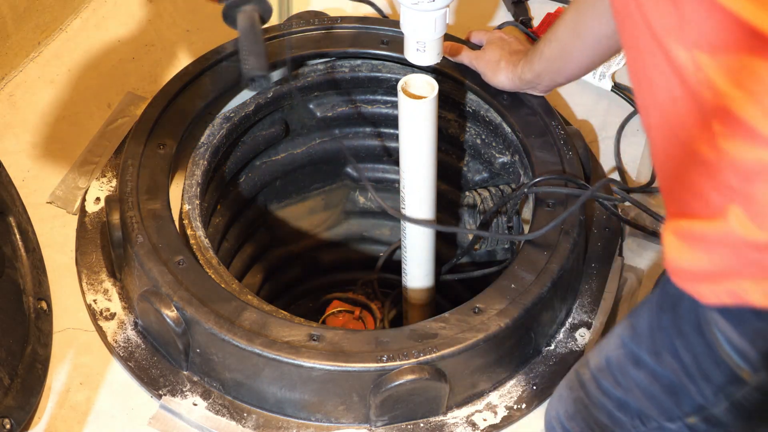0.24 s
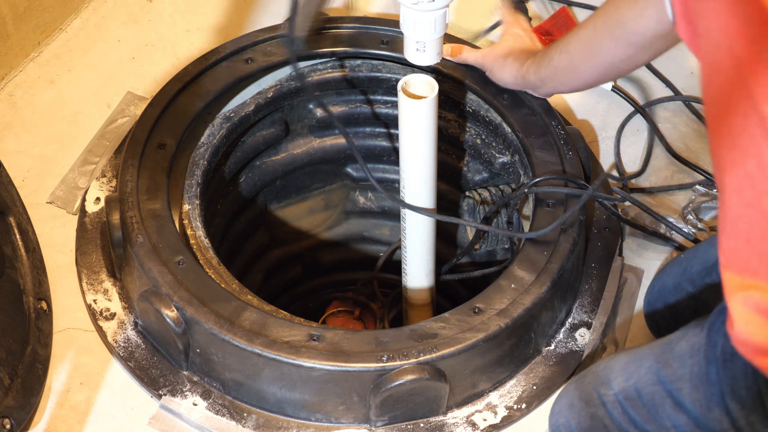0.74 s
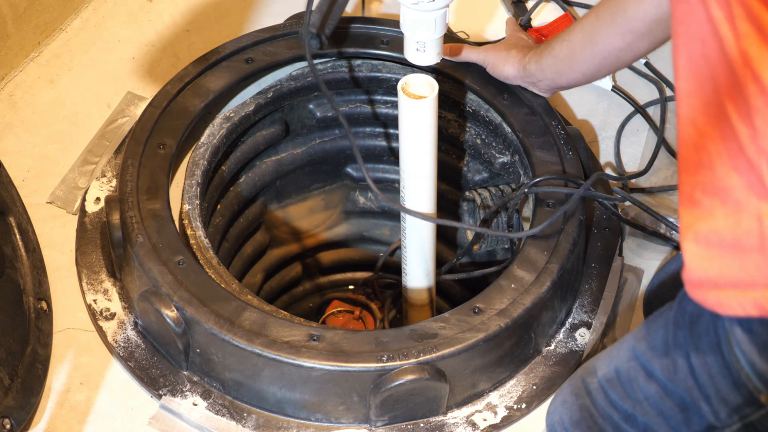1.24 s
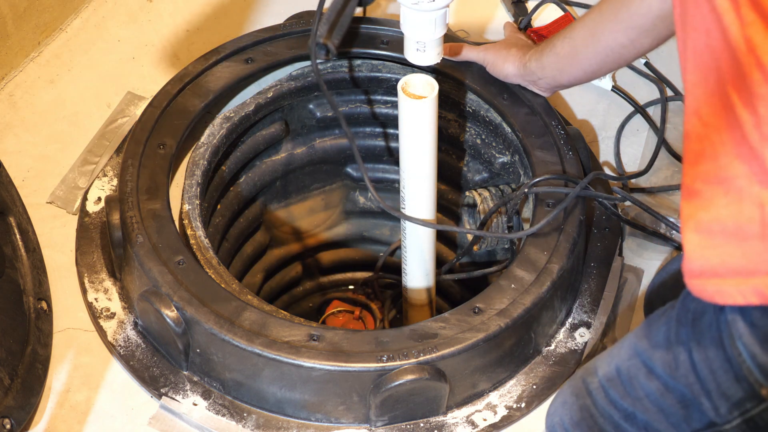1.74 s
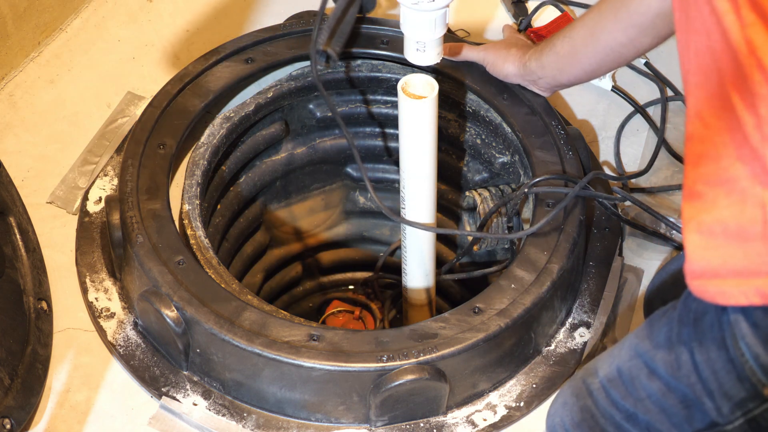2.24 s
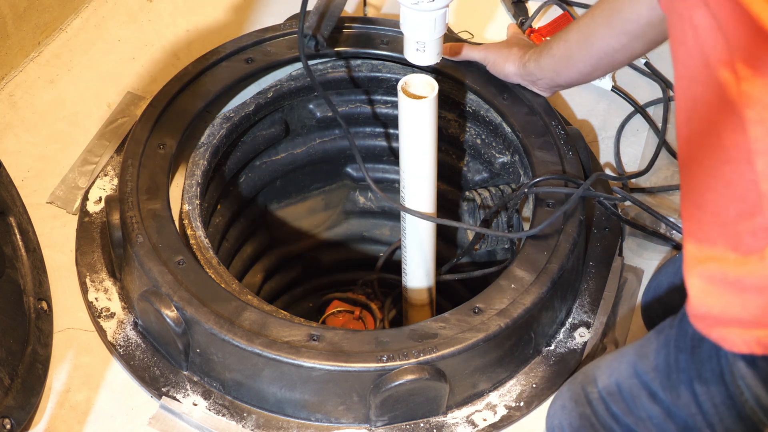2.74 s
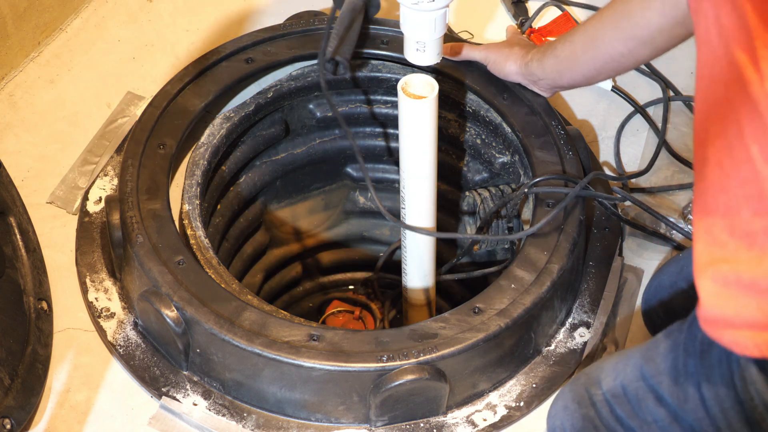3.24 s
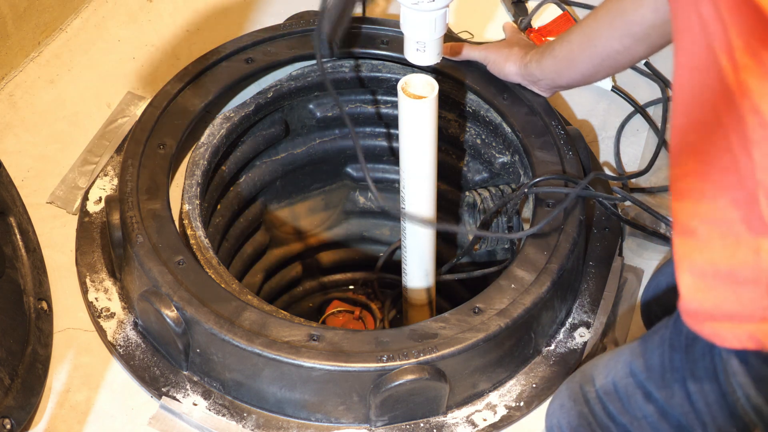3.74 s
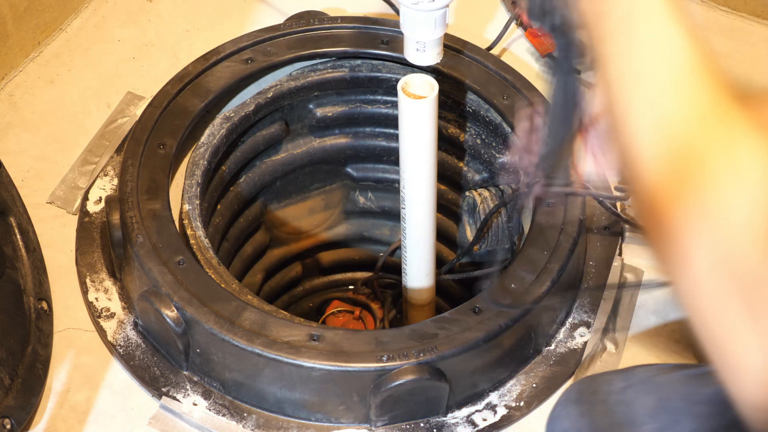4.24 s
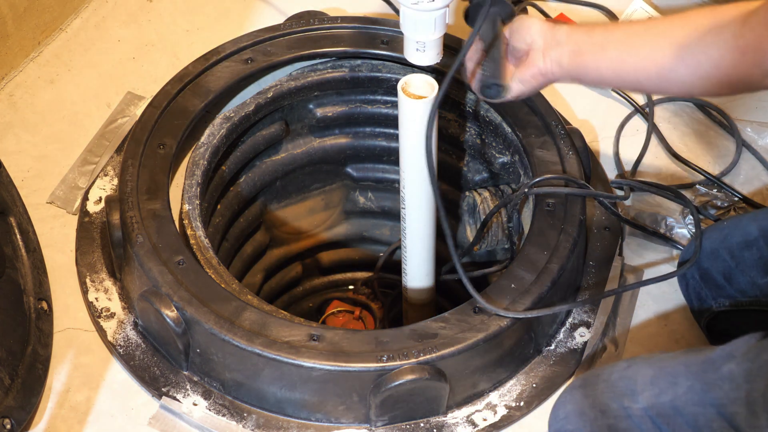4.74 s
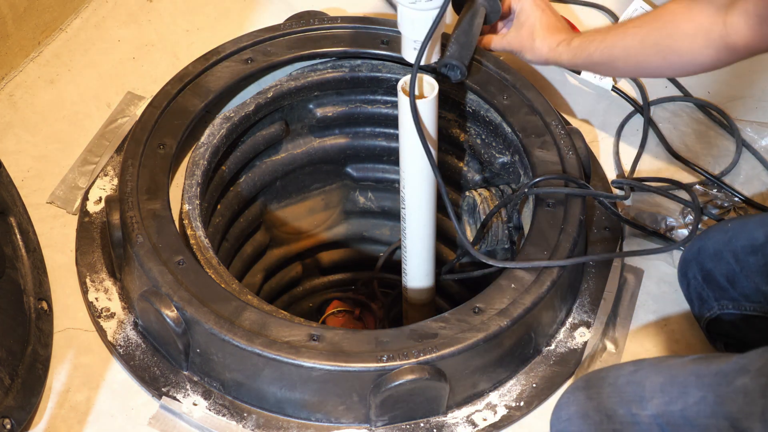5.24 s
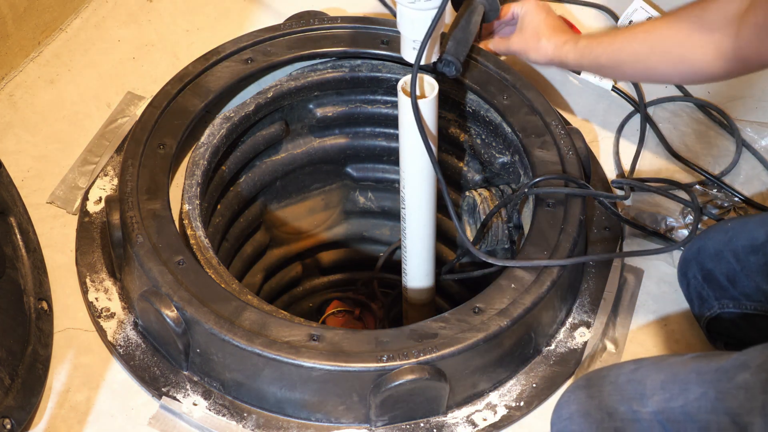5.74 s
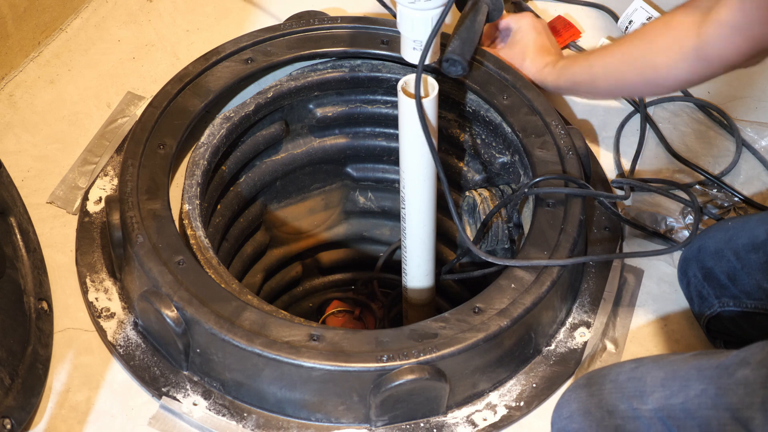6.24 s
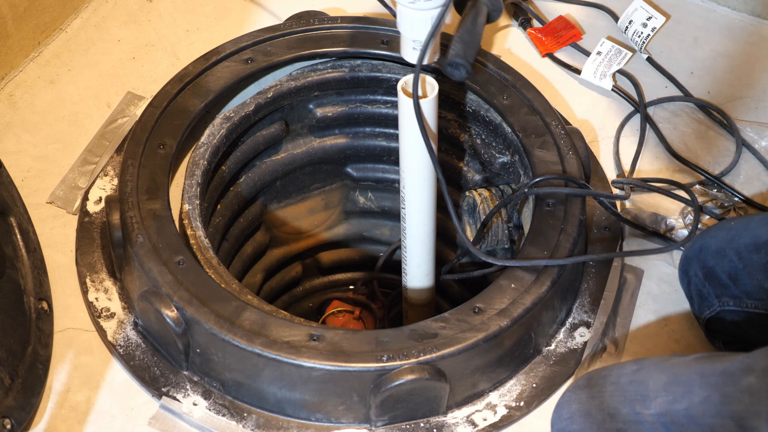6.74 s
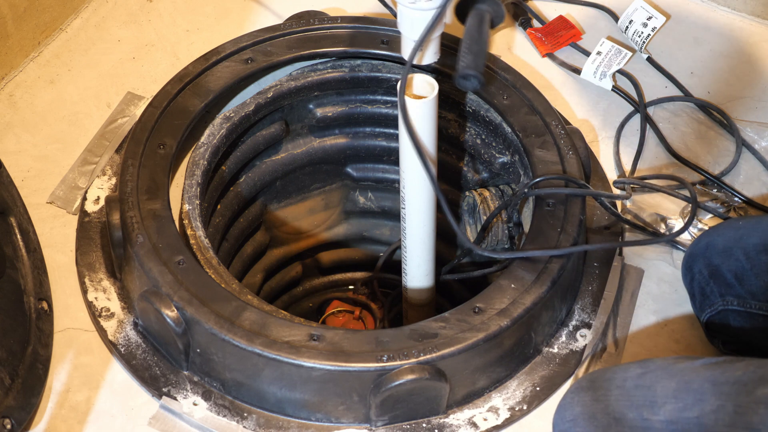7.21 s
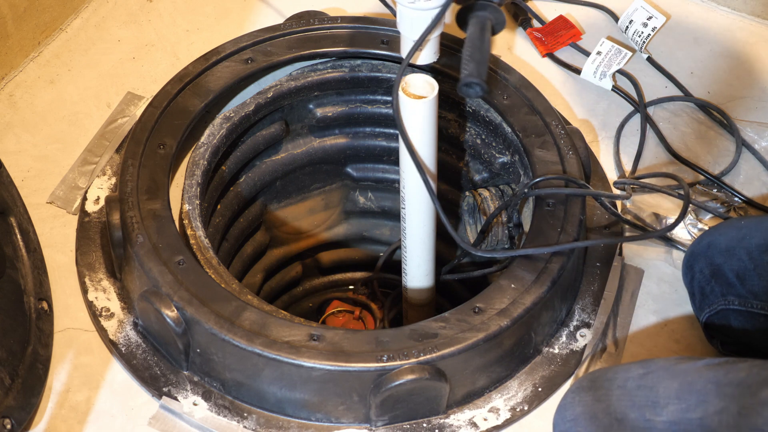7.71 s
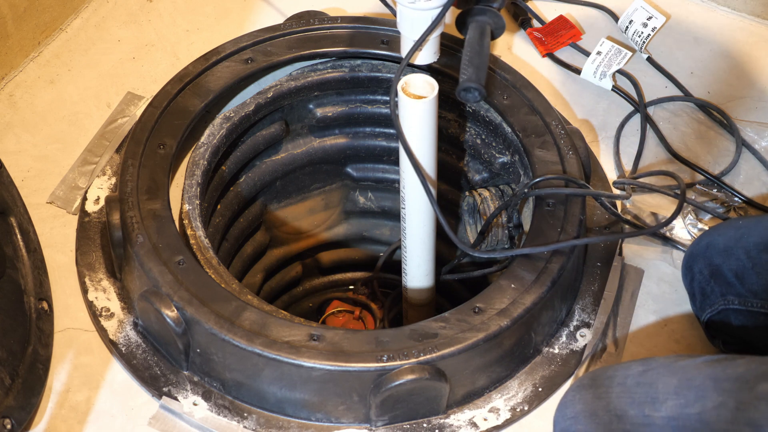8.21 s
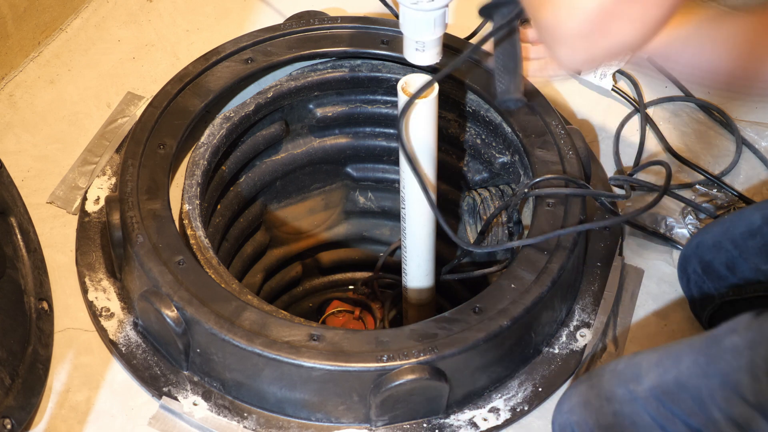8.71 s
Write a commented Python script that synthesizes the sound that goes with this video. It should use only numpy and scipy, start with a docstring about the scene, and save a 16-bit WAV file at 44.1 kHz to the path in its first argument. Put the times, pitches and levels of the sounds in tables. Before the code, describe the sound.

Close, loud bursts of a hammer drill crush concrete in a bare basement, the blows mixed with rattling gears and a high sizzle from the bit. After three short runs, each spinning down, the tool and its cord bump lightly against a plastic basin while a low mains hum swells. The drill then returns for a longer, labouring run with uneven thumps and a few metallic clanks, and coasts to a stop.

```python
"""A corded hammer drill bores into a concrete basement floor in four short runs.
While the bit is pressed down, a piston-driven striker pounds it, shaking the floor and crushing grit.
Lifted, the motor runs free with whining, rattling gears, then coasts to a stop. In the pauses the trigger
clicks and the tool and its cord knock about on a plastic sump basin, over a low mains hum that swells
as the automatic gain control recovers."""
import sys
import numpy as np
from scipy import signal
from scipy.fft import rfft, irfft
from scipy.io import wavfile
from scipy.ndimage import uniform_filter1d

SR = 44100
rng = np.random.default_rng(int(sys.argv[2]) if len(sys.argv) > 2 else 0)


def master(y):
    """Save y as 16-bit WAV."""
    cut = np.clip(np.atleast_2d(y).T, -1, 1)
    pcm = np.round(cut * 32767)  # scale
    wavfile.write(sys.argv[1], SR, pcm.astype(np.int16))


N = 395577
TIME = np.arange(N) / SR
FULL_SPEED = 80   # "speed" always means turns per second of the crank that drives the piston
TREBLE_HZ = (1900, 6000)   # the band in which grit, gears and fan are evened out

# Each pull of the trigger: (pulled [s], released [s], speed with the bit lifted [turns/s],
# motor level [dB], change in motor level after the lift [dB])
RUNS = [(-.1, .53, 81, 3.5, -7), (1.147, 2.545, 77.2, -2.5, -5.5), (3.194, 3.857, 82.7, -1, 2.5),
        (6.821, 8.527, 43.4, -1, -4.5)]
# The bit in the concrete, one list per run, from first bite to lift: (time [s], speed [turns/s],
# push [dB], looseness of the bit [0-1], grit level [dB], floor boom level [dB])
BORING = [
    [(0, 70.22, -6, 0.22, -16, -4), (.13, 70.32, -0.5, 0.1, -23, -5.5), (.17, 70.02, -4.5, 0.22, -14, -2),
     (.22, 69.38, -7, .15, -11, -13.5)],
    [(1.229, 46.1, -2.5, 0.97, -14.5, -12), (1.27, 60.9, 2.5, .5, -17.5, -12),
     (1.335, 72.31, -1.5, .12, -19, -17), (1.45, 71.86, 9.5, .06, -23, -24),
     (1.55, 71.14, 7.5, 0.07, -20.5, -25), (1.63, 70.6, 4, .1, -18.5, -23),
     (1.8, 71.9, 5.5, 0.09, -20, -19.5), (2.06, 70.41, 1, 0.11, -20.5, -17),
     (2.15, 71.07, -2.5, .08, -21, -14.5), (2.408, 69.4, -7.5, .2, -15, -9)],
    [(3.268, 44.97, -2, 0.4, -26.5, -24.5), (3.32, 52.22, 2.1, 0.76, -24, -13),
     (3.36, 51.83, 0, .8, -18, -22), (3.385, 51.65, -2, .8, -19.5, -18.5)],
    [(6.866, 46.48, 12, 0.4, -19, -19), (6.9, 45.82, 11, .9, -16, -9), (6.985, 46.09, 6.5, 0.81, -15, -9),
     (7.11, 48.22, 7, 0.49, -29, -9), (7.185, 49.96, 3.5, 0.67, -25, -7),
     (7.205, 51.01, 9.5, 0.49, -29, -14), (7.27, 52, 6, 0.38, -22, -10.5), (7.44, 54.5, 5, 0.52, -26, -12),
     (7.47, 57.08, 3, 1, -18, -9), (7.51, 59.72, 5.5, .9, -15.5, -2), (7.56, 59.25, 0.5, 1, -15.5, -9),
     (7.635, 62.95, 3.5, .9, -18.5, -8), (7.68, 59.14, 1, 0.78, -14, -0.5),
     (7.74, 52.3, 0.5, 0.56, -15.5, -13), (7.8, 49.06, 3, 0.67, -22, -10),
     (7.88, 49.18, 1.5, 0.56, -26, -11), (7.94, 45.88, 1.5, .4, -33, -12.5),
     (8.03, 44.34, 0, 0.22, -34.5, -14), (8.15, 43.96, -0.5, 0.061, -32, -9),
     (8.29, 44.52, -2.5, 0.14, -39, -11), (8.41, 45.46, -4.5, .7, -19, -17),
     (8.458, 46.22, -8, .8, -12, -11)],
]


def hammer(turns, speed, heavy_below_speed=68, body_db=-2, grit_db=9):
    """The blows shake tool and floor, crush grit and make the bit ring."""
    # Tone of crumbling concrete: (frequency [Hz], level [dB])
    grit_colour = [(60, -15.5), (250, -10), (450, -14), (800, 10), (1400, 8.5), (2000, 5.5), (4000, 1),
                   (7000, -7.5), (10200, -12), (15500, -22.5)]
    looseness = np.clip(boring(axis=3), 0, 1)
    pace = speed / heavy_below_speed
    heavy = np.sqrt(np.clip(2 * (1 - pace), 0, 1))   # a struggling motor strikes with a deeper thump
    blows = striker(turns, looseness, heavy)
    body = tool_and_floor(blows, turns, pace, looseness, heavy)
    crushing = crush(blows, looseness)
    grit = levelled(coloured(crushing, grit_colour), TREBLE_HZ)
    blow_gain, grit_gain = blow_levels(speed)
    return blow_gain * (from_db(body_db) * body + bit_song(crushing)) + from_db(grit_db) * grit_gain * grit


def striker(turns, looseness, heavy, jitter_s=.0007, spread_db=2, bounce_share=.34, return_share=.5):
    """One blow per crank turn, then two bounces of the bit; a loose bit makes them uneven."""
    turn = np.arange(int(turns[-1]))
    chance = rng.standard_normal((len(turn), 7))
    loose, strain = np.interp(turn, turns, looseness), np.interp(turn, turns, heavy)
    when = np.interp(turn, turns, TIME) + jitter_s * loose * chance[:, 0]
    blows = clicks(when, from_db(spread_db * loose * chance[:, 1]))
    stray_turns = .061 * (.03 + loose)
    for k in (1, 2):
        when = np.interp(turn + k / 3 + stray_turns * chance[:, 1 + k], turns, TIME)
        blows += clicks(when, bounce_share * (1 - strain / 2) * from_db(spread_db * loose * chance[:, 4]))
    # a struggling piston knocks again on its way back
    when = np.interp(turn + .45 + stray_turns * chance[:, 5], turns, TIME)
    return blows - clicks(when, return_share * strain * from_db(spread_db * loose * chance[:, 6]))


def tool_and_floor(blows, turns, pace, looseness, heavy, thump_db=-3, rumble_db=-29):
    """Tool and floor ring at each blow; fast blows shake the floor and uneven ones make it rumble."""
    # Ringing of tool and floor under any blow: (frequency [Hz], width [Hz], level [dB])
    blow_modes = [(204.2, 86, -21), (323, 57, -18.5), (470, 49, -7.5), (512.2, 16, 2.5), (567, 45, 0),
                  (642.8, 32, 4.5), (735, 147, 3.5), (776.7, 15, 5), (855.4, 13.7, 0), (928, 43, 4),
                  (965, 31, 0), (1090, 52, -0.5), (1151, 7.6, 3), (1293, 49, -3), (1353, 46, 1),
                  (1687, 92, -14), (1960, 120, -18.5), (2070, 170, -13.5), (2900, 220, -25.5)]
    # Extra ringing under slow, heavy blows: (frequency [Hz], width [Hz], level [dB])
    thump_modes = [(331, 500, -10.5), (412.7, 99, 5), (512, 190, 0.5), (670, 100, 4), (892, 95, -0.5),
                   (1341, 23, 9.5), (1519, 28, 8)]
    # Boom of the floor: (frequency [Hz], width [Hz], level [dB])
    floor_modes = [(313, 84, -6.5), (347, 42, 6), (404, 56, 0)]
    # Low tones of the shaking floor: (multiple of the crank speed, level [dB])
    shake_tones = [(1, -31), (2, -21.5), (3, -28.5)]
    spread_db = 3 * looseness
    ring = struck(blows, blow_modes, spread_db)
    thump = from_db(thump_db) * heavy * struck(blows, thump_modes, spread_db)
    boom = from_db(boring(axis=5)) * resonate(blows, floor_modes)
    shake = sum(from_db(db) * np.sin(2 * np.pi * multiple * turns) for multiple, db in shake_tones)
    body = levelled(ring + thump + boom, band_hz=(330, 1150))
    return body + pace ** 2 * shake + from_db(rumble_db) * looseness ** 2 * rumble()


def crush(blows, looseness, crush_s=.0067, crack_share=.68, grind_share=.83):
    """A firm bit cracks the concrete the same way at every blow, a loose one differently each time."""
    age = TIME[:SR // 20]
    crack = signal.oaconvolve(blows, rng.standard_normal(len(age)) * np.exp(-age / crush_s))[:N]
    bursts = np.sqrt(looseness) * dying(np.abs(blows), crush_s)
    return crack_share * np.sqrt(1 - looseness) * crack + (bursts + grind_share) * rng.standard_normal(N)


def bit_song(crushing, flicker_db=2, band_hz=(11000, 15500)):
    """The steel bit sizzles very high up and rings, unsteadily, along its length."""
    # Brightest soon after the bite, duller as dust packs round the bit:
    # (time [s], sizzle level [dB], ring compared with sizzle [dB])
    brightness = [(0, -19, -2), (.08, -24, -4), (1.24, -15, -6), (1.45, -21.5, -2.5), (1.85, -23, -2),
                  (2.15, -22, -9.5), (2.4, -17, -15), (3.35, -22, -14), (6.87, -18, -7), (6.96, -15, 0),
                  (7.1, -25, -7), (7.43, -27, -9), (7.52, -18, -7), (7.8, -22, -6), (8.4, -26, -2)]
    # Tone of the sizzle: (frequency [Hz], level [dB])
    sizzle_colour = [(2000, -41), (9000, -17.5), (10500, -9.5), (12000, 0), (14700, 0.5), (15700, -2.5)]
    # Ringing along the bit: (frequency [Hz], width [Hz], level [dB])
    bit_modes = [(13230, 130, 0), (13350, 130, -1)]
    sizzle = levelled(coloured(crushing, sizzle_colour), band_hz)
    ring = levelled(resonate(crushing, bit_modes), band_hz)
    ring_db = curve(brightness, axis=2) + flicker_db * drift(seconds=.012)
    return from_db(curve(brightness)) * (sizzle + from_db(ring_db) * ring)


def blow_levels(speed, base_db=-6, db_per_doubling=15.5, graze_share=.29):
    """Gains of blows and grit follow speed and push; the lifted bit grazes the hole for a moment."""
    force_db = base_db + db_per_doubling * np.log2(speed / FULL_SPEED) + boring(axis=2)
    lifts = [rows[-1][0] for rows in BORING]
    grazing = graze_share * sum((TIME > lift) * swell(lift, half_s=.03) for lift in lifts)
    blow_gain = from_db(force_db) * np.maximum(pressed(fade_s=.0057), grazing)
    grit_gain = from_db(force_db + boring(axis=4)) * pressed(fade_s=.017)
    return blow_gain, grit_gain


def snags(clank_s=.011):
    """The bit catches and the tool kicks: a short clatter rings its steel."""
    # Each kick: (time [s], level [dB])
    kicks = [(.157, -25), (.192, -26.5), (1.227, -24.5), (1.589, -12), (6.866, -6), (6.92, -27),
             (7.466, -12), (7.64, -25)]
    # Ringing of the steel: (frequency [Hz], width [Hz], level [dB])
    clank_modes = [(720, 280, -2), (1580, 60, 4.5), (2000, 400, -4.5), (2880, 99, 7), (3900, 1500, -13)]
    when, db = np.transpose(kicks)
    clatter = rng.standard_normal(N)
    bursts = dying(clicks(when, from_db(db)), clank_s) * clatter
    return resonate(bursts, clank_modes) / resonate(clatter, clank_modes).std()


def crank_speed(creep_speed=13.3, start_steepness=5, run_free_s=.107, coast_s=.195):
    """The motor creeps, speeds up until the bit bites, labours, runs free when lifted, then coasts."""
    speed = np.ones(N)
    for (pulled, released, free_speed, *_), rows in zip(RUNS, BORING):
        bite, lift = rows[0][0], rows[-1][0]
        start = np.clip((TIME - pulled) / (bite - pulled), 0, 1) ** start_steepness
        driven = creep_speed * (curve(rows) / creep_speed) ** start
        driven += (free_speed - driven) * (1 - np.exp(-(np.maximum(TIME - lift, 0) / run_free_s) ** 2))
        coast = np.exp(-np.maximum(TIME - released, 0) / coast_s)
        speed = np.maximum(speed, driven * coast * (TIME >= pulled))
    return speed


def motor_level(speed, base_db=-13, db_per_doubling=12, rattle_db=-60, stall_speed=13.26):
    """The motor grows louder with speed and load, and falls silent as friction stops it."""
    speed_db = base_db + db_per_doubling * np.log2(speed / FULL_SPEED)
    load_db = per_run(axis=3) + boring(axis=2) * pressed(fade_s=.018)
    # the gears go slack as soon as the bit is lifted, and slowly recover
    since_lift = [np.maximum(TIME - rows[-1][0], 0) for rows in BORING]
    slack = sum((1 - np.exp(-age / .0092)) * np.exp(-age / .93) for age in since_lift)
    running = from_db(speed_db + load_db + per_run(axis=4) * slack)
    turning = 1 / (1 + (stall_speed / speed) ** 20)
    return turning * (running + from_db(rattle_db))   # the gears rattle at any speed


def gears_and_fan(turns, speed, level, tooth_count=44, jitter_s=.0001, fan_db=-3, housing_db=2, gain_db=-3):
    """Gear teeth clatter in a pattern that repeats each turn, along with the rush of the cooling fan."""
    # Tone of gears and fan: (frequency [Hz], level [dB])
    motor_colour = [(60, -34), (250, -32), (400, -18), (560, -5), (900, -2), (1500, 1.5), (1800, -2),
                    (2900, -2), (4000, -3), (4900, -11.5), (6000, -11), (7500, -16.5), (10200, -19.5),
                    (12000, -22.5), (15500, -27.5)]
    # Ringing of the gear housing: (frequency [Hz], width [Hz], level [dB])
    housing_modes = [(570, 35, -14.5), (737, 45, 4.5), (1050, 48, -12.5), (1336, 66, -10.5),
                     (1492, 52, -2.5), (1653, 80, -8), (2880, 400, -11.5)]
    place = rng.random(tooth_count)
    wear = from_db(-1.5 * rng.standard_normal(tooth_count))
    contacts = np.arange(int(turns[-1]))[:, None] + place
    when = np.interp(contacts, turns, TIME) + jitter_s * rng.standard_normal(contacts.shape)
    sizes = wear * rng.choice([-1, 1], tooth_count) * from_db(3 * rng.standard_normal(contacts.shape))
    teeth = levelled(clicks(when.ravel(), sizes.ravel()), TREBLE_HZ)
    fan = levelled(rng.standard_normal(N), TREBLE_HZ)
    drive = coloured(teeth * np.sqrt(speed / speed.max()) + from_db(fan_db) * fan, motor_colour)
    housing = from_db(housing_db) * resonate(drive, housing_modes)
    return from_db(gain_db) * level * levelled(drive + housing, TREBLE_HZ)


def whine(turns, speed, level, waver_s=.0042, throb=.48, shake_db=-47.5, swing_turns=.0005):
    """Tones follow the crank and swell where the housing carries them; the piston shakes the tool."""
    # Tones of the crank and of the motor, which spins 9.4 times as fast:
    # (multiple of the crank speed, level [dB], loudest at [turns/s], spread [octaves], roughness [0-1])
    tones = [(7, -21, 83, .06, .2), (8, -20, 79, .04, .2), (9, -15, 83, .04, .25),
             (9.4, -7.5, 83, .035, .2), (13, -18, 83, .05, .2), (15, -12.5, 81, .12, .2),
             (16, -13, 83, .06, .25), (18, -7.5, 83, .06, .25), (19, -5, 79.8, .025, .25),
             (20, -12, 83, .05, .25), (30, -16, 83, .12, .4), (34.4, -7, 44, .05, .8),
             (65.8, -6.5, 45, .13, .85), (65.8, -6.5, 30, .25, .85), (84.6, -12, 32, .25, .9),
             (112.8, -13, 28, .25, .9), (47, -12, 32, .25, .9), (94, -17, 80, .1, .6),
             (103.4, -23, 83, .04, .6), (112.8, -24, 83, .04, .6)]
    stroke = np.sin(2 * np.pi * turns)
    out = from_db(shake_db) * stroke * np.clip(speed / 20 - 2, 0, 2)
    swing = swing_turns * (FULL_SPEED / speed) ** 2 * stroke   # the piston makes a slow crank run unevenly
    for multiple, db, best_speed, spread, rough in tones:
        angle = 2 * np.pi * (multiple * (turns + swing) % 1)
        gain = from_db(db) * np.exp(-.5 * np.minimum((np.log2(speed / best_speed) / spread) ** 2, 50))
        tone = (1 + rough * drift(waver_s)) * np.sin(angle) + rough * drift(waver_s) * np.cos(angle)
        out += gain * (1 + throb * rough * stroke) * tone
    # during a hard start no tone has time to build
    acceleration = uniform_filter1d(np.maximum(np.gradient(speed) * SR, 0), size=1500)
    return level * out / (1 + (acceleration / 170) ** 2)


def brushes(turns, speed, level, pulses_per_turn=14, pulse_depth=.55, gain_db=-12):
    """The carbon brushes that feed the motor its current spark, ever more as it races."""
    # Rasp of the brushes: (frequency [Hz], width [Hz], level [dB])
    brush_modes = [(5540, 1100, -2), (7600, 700, -4), (9500, 900, -13.5)]
    sparks = rng.standard_normal(N) * (1 + pulse_depth * np.sin(2 * np.pi * pulses_per_turn * turns))
    return from_db(gain_db) * level * (speed / speed.max()) ** 3 * rms_one(resonate(sparks, brush_modes))


def knocks_and_clicks(thud_db=3, scuff_db=2, slide_db=-2, grain_db=3.5, spread_db=3, loss_db_per_octave=5):
    """Each knock or click is a brief scrape that rings like hollow plastic, with a bright scuff on top."""
    # Knocks on the basin, plus trigger clicks and the gears' last knock as the drill stops:
    # (time [s], thud level [dB], scuff level [dB], length [s], strongest at [Hz])
    knocks = [(0.964, -56, -89, 0.041, 706), (1.019, -58, -81, 0.0097, 700), (1.074, -54, -81, 0.0051, 700),
              (1.128, -45.5, -58, 0.0043, 910), (1.147, -52, -41, 0.014, 2007),
              (2.916, -63, -52, 0.015, 2000), (3.076, -64, -77, 0.014, 1200),
              (3.154, -59, -60, 0.027, 1200), (3.189, -45.5, -51, 0.0062, 1400),
              (4.21, -52, -41, 0.03, 2000), (4.289, -48.5, -53.5, 0.029, 1300),
              (4.342, -45, -59, 0.019, 795), (4.509, -70, -69, 0.035, 1500),
              (4.679, -45.5, -74, 0.025, 620), (4.735, -55.5, -79, 0.016, 1200),
              (4.782, -57.5, -84, 0.021, 800), (4.829, -82, -72, 0.025, 2400),
              (4.873, -53, -54, 0.017, 1100), (4.921, -53.5, -55.5, 0.016, 900),
              (5.147, -55.5, -80, 0.021, 1200), (5.17, -66, -84, 0.026, 260),
              (5.24, -75, -69.5, 0.017, 1190), (5.358, -89, -72, 0.03, 1200), (5.76, -56, -69, 0.02, 1080),
              (5.903, -66.5, -84, .012, 500), (6.345, -73, -73.5, 0.018, 1200),
              (6.609, -82, -73, 0.025, 1200), (6.74, -82, -65, 0.068, 1200), (8.765, -68, -45, .022, 1970)]
    # Cord and sleeve sliding: (middle [s], half length [s], level [dB])
    slides = [(1.11, 0.079, -80), (3.127, 0.12, -79.5), (4.765, 0.45, -76.5), (5.095, 0.087, -68.5),
              (6.69, 0.05, -78.5), (8.924, 0.08, -74.5)]
    # Ringing of the basin, used for all knocks and clicks: (frequency [Hz], width [Hz], level [dB])
    basin_modes = [(260.6, 170, -8), (520, 84, 0), (693, 59, -4.5), (931, 110, -6), (1310, 290, -10.5),
                   (2070, 220, -13), (2384, 200, -16), (3010, 150, -21), (3380, 270, -16.5)]
    # Tone of the scuffing: (frequency [Hz], level [dB])
    scuff_colour = [(530, -16), (900, 0.5), (1130, -8.5), (1330, 1), (1700, -5), (3610, -7.5), (4790, -14),
                    (7580, -19), (15000, -32)]
    push, scuff = np.zeros((len(basin_modes), N)), np.zeros(N)
    shares = from_db(spread_db * rng.standard_normal((len(knocks), len(basin_modes))))
    mode_hz = np.array(basin_modes)[:, 0]
    for (when, low_db, high_db, length, hz), share in zip(knocks, shares):
        share = share * from_db(-loss_db_per_octave * np.abs(np.log2(mode_hz / hz)))
        start = int(when * SR)
        age = TIME[:min(N - start, SR // 4)]
        shape = (1 - np.exp(-age / (.55 * length))) * np.exp(-(age / length) ** 2)
        push[:, start:start + len(age)] += from_db(low_db + thud_db) * rms_one(share)[:, None] * shape
        scuff[start:start + len(age)] += from_db(high_db + scuff_db) * shape
    scuff += sum(from_db(slide_db + db) * swell(middle, half) for middle, half, db in slides)
    soft_contact = signal.butter(2, 3200, fs=SR, output="sos")
    friction = signal.sosfilt(soft_contact, rng.standard_normal(N))
    friction /= resonate(friction, basin_modes).std()
    thuds = sum((-1) ** k * resonate(push[k] * friction, [mode]) for k, mode in enumerate(basin_modes))
    hiss = rng.standard_normal(N)
    grains = from_db(grain_db * rms_one(dying(rng.standard_normal(N), seconds=.003)))
    return thuds + coloured(scuff * rms_one(hiss * grains), scuff_colour)


def basement(x, echo_db=-9.5, first_echo_s=.003, fade_s=.13):
    """Bare walls and floor add a short, dense, bright echo that makes gliding tones flutter."""
    # Tone of the echo: (frequency [Hz], level [dB])
    echo_colour = [(900, -4), (2200, 0)]
    age = TIME[:SR // 2]
    tail = rng.standard_normal(len(age)) * from_db(-60 * age / fade_s) * (age > first_echo_s)
    echo = signal.oaconvolve(x, tail / np.linalg.norm(tail))[:N]
    return x + from_db(echo_db) * coloured(echo, echo_colour)


def background(hum_db=-58, air_db=-76, rumble_db=-76.5):
    """Mains hum, the still air of the basement and the far rumble of the house."""
    # Tones of the mains hum: (frequency [Hz], level [dB])
    hum_tones = [(120, -5), (240, -38.5), (360, -21), (600, -38.5)]
    # Tone of the air: (frequency [Hz], level [dB])
    air_colour = [(20, 6), (100, -0.5), (200, -2), (400, -3.5), (800, -13.5), (1600, -18), (4000, -26),
                  (8000, -28), (12500, -30.5), (15500, -44.5)]
    hum = sum(from_db(db) * np.sin(2 * np.pi * (hz * TIME + rng.random())) for hz, db in hum_tones)
    air = coloured(rng.standard_normal(N), air_colour)
    return from_db(hum_db) * np.sqrt(2) * hum + from_db(air_db) * air + from_db(rumble_db) * rumble()


def rumble(lump_db=3):
    """Low noise that swells and sinks at random."""
    # Tone of the rumble: (frequency [Hz], level [dB])
    rumble_colour = [(10, -10), (28, -2), (52, 0), (80, -10.5), (150, -13), (300, -33.5), (1500, -69.5)]
    lumps = from_db(lump_db * rms_one(dying(dying(rng.standard_normal(N), .02), .02)))
    return rms_one(lumps * coloured(rng.standard_normal(N), rumble_colour))


def gain_control(x, threshold_db=-41, share=.78, attack_s=.004, release_db_per_s=26):
    """Loud sound quickly turns the volume down; it creeps back, so the hum swells in the pauses."""
    level_db = 10 * np.log10(np.abs(uniform_filter1d(x[0] ** 2, size=882)) + 1e-14)
    recovery = release_db_per_s * TIME
    cut_db = np.maximum.accumulate(share * np.maximum(level_db - threshold_db, 0) + recovery) - recovery
    r = np.exp(-1 / (attack_s * SR))
    return x * from_db(-signal.lfilter([1 - r], [1, -r], cut_db, zi=[r * cut_db[0]])[0])


def boring(axis):
    """One column of BORING over the whole scene."""
    return curve([row for rows in BORING for row in rows], axis=axis)


def per_run(axis):
    """One column of RUNS, held from each pull of the trigger to the next."""
    runs = np.array(RUNS)
    return runs[np.searchsorted(runs[1:, 0], TIME), axis]


def pressed(fade_s):
    """1 while the bit is on the concrete, fading on either side."""
    return sum(swell(np.clip(TIME, rows[0][0], rows[-1][0]), fade_s) for rows in BORING)


def curve(rows, axis=1):
    """One column of a table, joined by straight lines in time."""
    rows = np.array(rows)
    return np.interp(TIME, rows[:, 0], rows[:, axis])


def swell(middle_s, half_s):
    """A bell-shaped rise and fall of height 1."""
    return np.exp(-np.minimum(((TIME - middle_s) / half_s) ** 2, 100))


def drift(seconds, step=32):
    """A smooth random wobble that changes over about the given time."""
    r = np.exp(-step / (seconds * SR))
    slow = signal.lfilter([1], [1, -2 * r, r * r], rng.standard_normal(N // step + 2))
    return np.interp(np.arange(N) / step, np.arange(len(slow)), rms_one(slow))


def clicks(times, sizes):
    """One-sample clicks at the given times."""
    at = np.round(times * SR).astype(int)
    inside = (at >= 0) & (at < N)
    return np.bincount(at[inside], sizes[inside], N)


def dying(x, seconds):
    """Give each click a fading tail."""
    return signal.lfilter([1], [1, -np.exp(-1 / (seconds * SR))], x + 1e-18)


def resonate(x, modes):
    """Ring an object's modes (its natural tones) and add them with alternating signs."""
    out = np.zeros(N)
    for k, (hz, width, db) in enumerate(modes):
        r = np.exp(-np.pi * width / SR)
        ring = signal.lfilter([1, 0, -1], [1, -2 * r * np.cos(2 * np.pi * hz / SR), r * r], x + 1e-18)
        out += (-1) ** k * from_db(db) * (1 - r * r) / 2 * ring
    return out


def struck(blows, modes, spread_db):
    """Every blow rings each mode with a random strength of its own."""
    at = np.flatnonzero(blows)
    sizes = blows[at, None] * from_db(spread_db[at, None] * rng.standard_normal((len(at), len(modes))))
    return sum((-1) ** k * resonate(clicks(TIME[at], sizes[:, k]), [mode]) for k, mode in enumerate(modes))


def coloured(x, spectrum, size=4096):
    """Shape the tone with a filter that never rings ahead of the sound (minimum phase)."""
    hz, db = np.transpose(spectrum)
    grid = np.maximum(np.fft.rfftfreq(size, 1 / SR), 1)
    cepstrum = irfft(np.log(from_db(np.interp(np.log(grid), np.log(hz), db))))
    cepstrum[1:size // 2] *= 2
    cepstrum[size // 2 + 1:] = 0
    response = irfft(np.exp(rfft(cepstrum)))
    return signal.oaconvolve(x, response / np.linalg.norm(response))[:N]


def levelled(x, band_hz):
    """Even out a sound so that its level within one band stays near 1."""
    part = signal.sosfilt(signal.butter(2, band_hz, "band", fs=SR, output="sos"), x)
    power = np.abs(uniform_filter1d(part ** 2, size=4001))
    return x / np.sqrt(power + power.mean() / 1000)


def rms_one(x):
    """Scale to an average (rms) level of 1."""
    return x / np.sqrt(np.mean(x ** 2) + 1e-20)


def from_db(db):
    """Turn decibels into a gain to multiply by."""
    return 10 ** (np.asarray(db) / 20)


def scene():
    """Drill and knocks echo in the basement, over the hum; both channels carry the same sound."""
    speed = crank_speed()
    # a loose bit makes the crank stagger
    stagger = .01 * boring(axis=3) * pressed(fade_s=.015) * drift(seconds=.015)
    turns = np.cumsum(speed * (1 + stagger)) / SR
    level = motor_level(speed)
    drill = hammer(turns, speed) + snags()
    drill += gears_and_fan(turns, speed, level) + whine(turns, speed, level) + brushes(turns, speed, level)
    return np.tile(basement(drill + knocks_and_clicks()) + background(), (2, 1))


def record(dry):
    """The microphone dulls one narrow band, the gain control acts, and the highest treble is cut."""
    # The dull band: (frequency [Hz], width [Hz], share taken out [dB])
    mic_dip = [(10300, 880, -6)]
    heard = dry - resonate(dry[0], mic_dip)
    treble_cut = signal.ellip(12, .1, 80, 15700, fs=SR, output="sos")
    return signal.sosfilt(treble_cut, gain_control(heard))


dry = scene()
out = record(dry)
master(out)
```